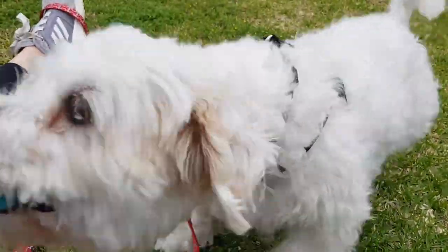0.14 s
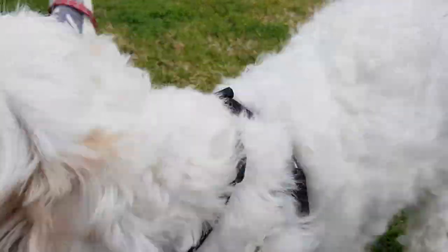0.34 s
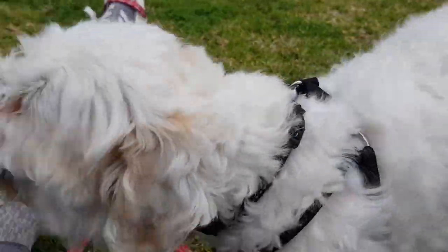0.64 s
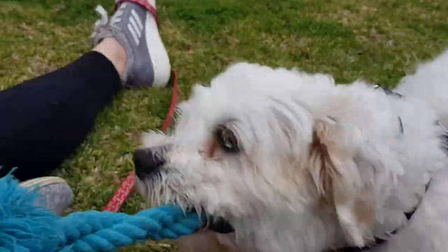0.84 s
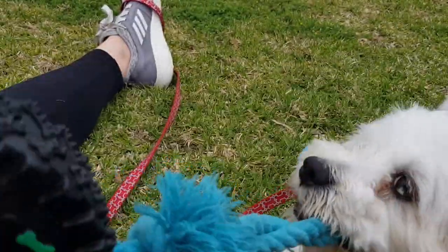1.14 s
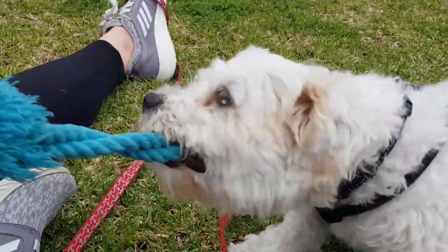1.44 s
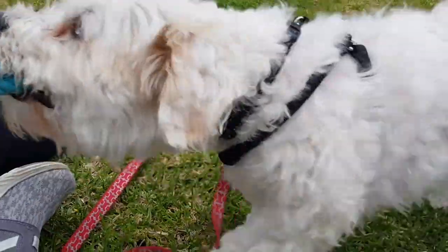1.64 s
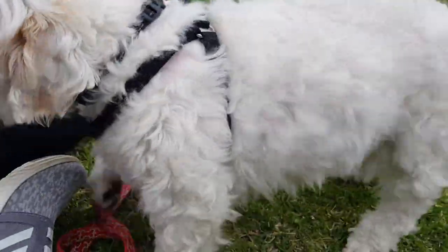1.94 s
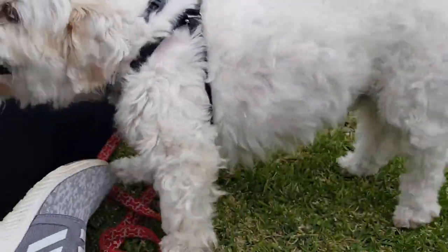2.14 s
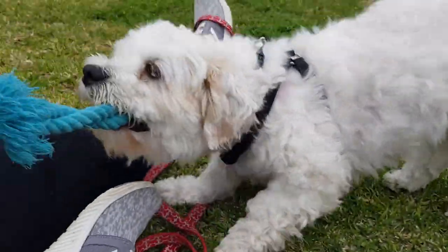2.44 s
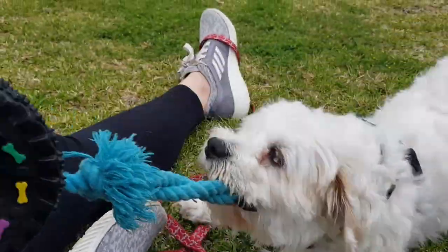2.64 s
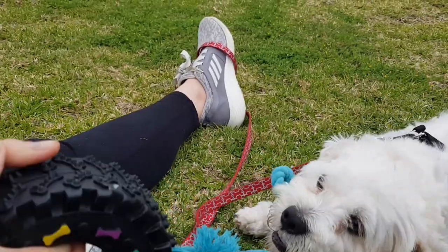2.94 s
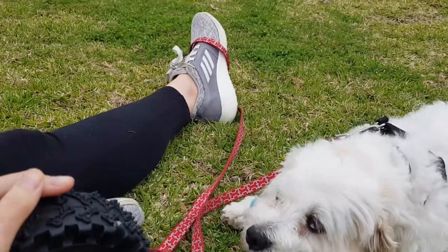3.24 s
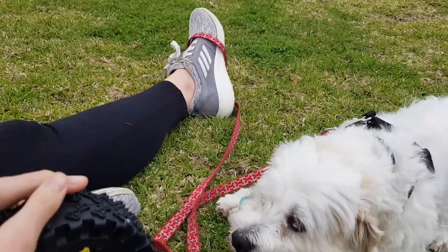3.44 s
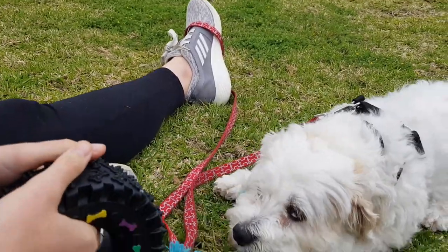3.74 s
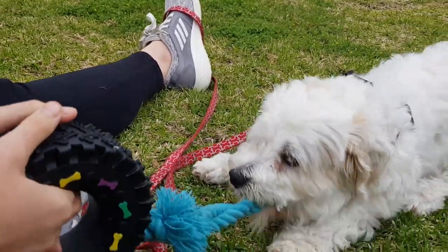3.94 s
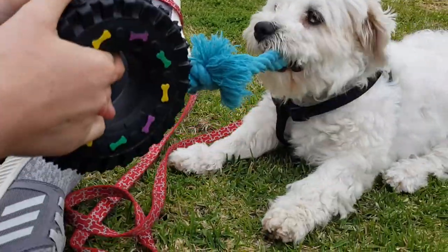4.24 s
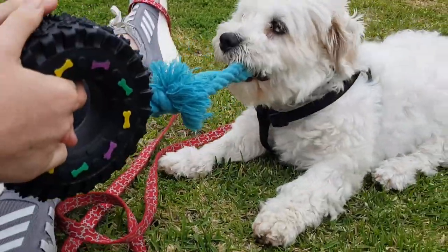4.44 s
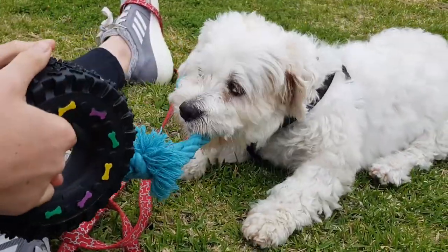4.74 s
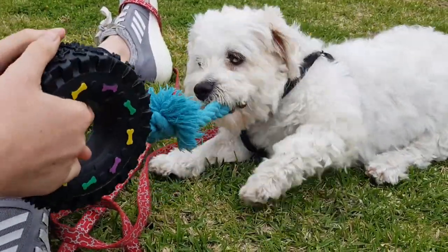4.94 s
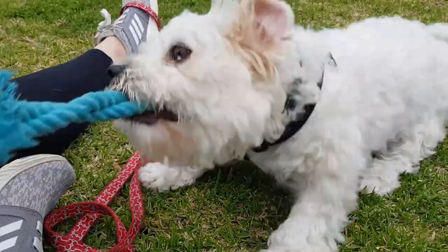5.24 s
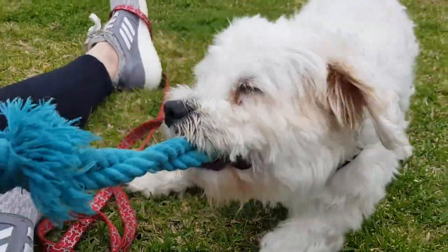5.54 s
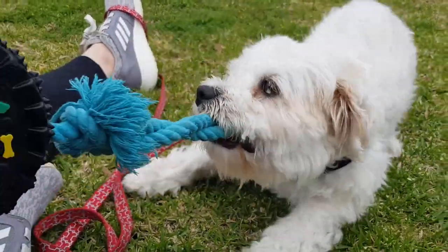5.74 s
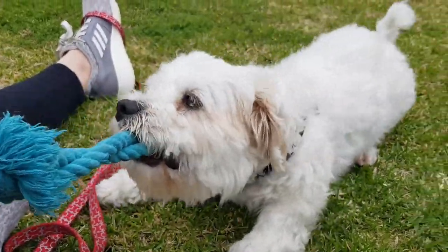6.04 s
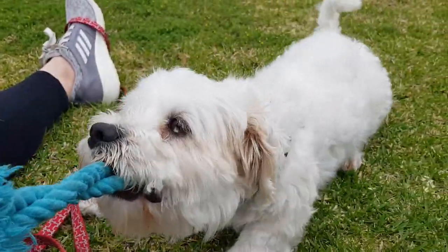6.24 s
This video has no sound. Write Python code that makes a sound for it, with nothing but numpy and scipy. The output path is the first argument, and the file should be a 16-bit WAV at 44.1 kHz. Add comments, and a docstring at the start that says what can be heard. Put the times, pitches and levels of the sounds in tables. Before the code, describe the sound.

A small dog growls in short rough bursts round a rope toy, close up, over rustling fur and grass, small snaps and a low distant engine hum.

```python
"""On a lawn, close to a two-port microphone, a small dog growls in short bursts round a rope toy, from
the first moment to the last: its flapping palate chops rough breath into throbs and its chest booms.
All along, fur, rope and grass rustle as flickering hiss; far off, an engine hums as one wavering tone
and the park washes as bass-heavy noise. The rubber toy knocks near 0.7 and 1.5 s as short sines, rope
and harness snap as noise ticks from 1.4 s on, and a thin tone whistles downward once, from 3.1 to 3.4 s."""
import sys
import numpy as np
from scipy import signal
from scipy.io import wavfile
from scipy.ndimage import uniform_filter1d

SR = 44100
rng = np.random.default_rng(int(sys.argv[2]) if len(sys.argv) > 2 else 0)


def wav_record(signal):
    """Record a signal, one row per channel, as 16-bit PCM in the file named by sys.argv[1]."""
    frames = np.transpose(np.atleast_2d(signal))
    bounded = np.clip(frames, -1, 1)
    # unit amplitude maps onto the largest positive 16-bit level
    quanta = np.round(bounded * 32767).astype(np.int16)
    wavfile.write(sys.argv[1], SR, quanta)


N = 280917

# The dog's growls, parts of growls and faint breaths, one a row:
# (first puff [s], last puff [s], place of the middle [0-1], puffs [count],
# slowing of the flutter [-1 to 1], effort at start, middle, end [dB, dB, dB],
# steady breath over effort at start, end [dB, dB], tongue resonance at start, end [Hz, Hz],
# throat, jaw, palate, lips, nose gains [dB each], change of throat, jaw and lips as the mouth moves [dB],
# left minus right [dB], chest over effort [dB], fold pitch at mid-growl [Hz], breadth of the chest boom [0-1])
GROWLS = [ (0.053, .298, 0.33, 10, -.05, -56, -51, -54.5, 3, 4.5, 1710, 1670, 11.5, 4.5, 1, -2, 1.5, -5, 6, 22, 114.4, 0.52),
          (0.345, 0.626, 0.15, 8, 0.2, -45, -45, -52, -1, -14.5, 1640, 1680, 6, -6, -4.5, -4.5, -5, -3.5, 7.5, 14, 140, 0.98),
          (0.898, 0.965, 0.4, 3, -0.017, -72, -57, -62, -4, 10.5, 1680, 1680, -3, -10, -3.5, -6.5, -3, 1, 3.5, -7, 140, .2),
          (1.209, 1.387, 0.096, 5, 0.35, -51.5, -47, -57.5, -12, -5, 1580, 1720, 3, -2, 1.5, -13, -8, 1.5, 2.5, 11, 132, 0.21),
          (1.682, 1.751, 0.22, 3, 0.85, -54.5, -47, -60.5, 4.5, -5, 1830, 1710, -10, -12.5, -3.5, -10, -4, 7.5, 7.5, -5, 140, .2),
          (1.999, 2.068, 0.46, 3, 0.14, -73.5, -78, -81.5, -1, 14, 1450, 1500, 13.5, -13, 8.5, -1, 4, 4, 3.5, -2, 140, .2),
          (2.344, 2.398, 0.56, 3, -0.084, -60.5, -62, -66.5, -10, 17, 1750, 1770, -7, -16, -7.5, -15, -8, 5, 2.5, -6, 140, .2),
          (2.664, 3.067, 0.71, 11, 0.14, -46.5, -43, -51.5, -9.5, -14, 1755, 1740, -3, 0.5, 3, -4.5, -8, -9.5, 4.5, 10, 160, 0.44),
          (3.279, 3.32, .5, 2, .01, -68.5, -66, -63.5, -9, -6, 1680, 1660, 3, -12, -3, -10, -11, .1, 6, 7, 140, .2),
          (3.52, 3.555, .5, 2, .01, -71, -72, -74.5, 0, -4, 1710, 1730, 4, .1, 0.5, -9, -18, .1, 4, 7, 140, .2),
          (3.823, 3.902, 0.61, 3, .07, -57.5, -53, -53.5, -19, -1.5, 1710, 1620, 3, -4, 7, -12.5, -5, 6.5, 4, 16.5, 160, 0.45),
          (3.957, 4.106, .3, 4, .05, -57, -61.5, -64, -4.5, 2.5, 1630, 1450, 8, -6, 0.5, -9.5, 0.5, -3, 4, 19, 162, 0.32),
          (4.419, 4.537, 0.45, 4, .01, -71, -73, -79, -1, 1, 1540, 1590, -15, -6, -14, -19, -8, 7, 8, 7, 140, .2),
          (4.754, 4.969, .4, 6, -0.11, -84, -85, -93, 7.5, 6, 1780, 1680, -10, -14, -9, -7, -18, 3, 5, 6, 140, .2),
          (5.073, 5.111, .5, 2, .01, -81.5, -74, -80, 8, 1, 1640, 1600, 3, -8, 3.5, -13, -3, -2, 9, 3, 140, .2),
          (5.147, 5.214, 0.52, 4, -0.2, -63.5, -56, -63, -8.5, 13, 1570, 1640, 5, 14.5, -4, -8, -4, -8.5, 4, -7, 140, .2),
          (5.337, 5.483, 0.21, 7, 0.13, -66, -57, -71.5, 3, 12.5, 1650, 1820, 4, 7, -0.5, 0.5, 2, -4.5, 5.5, 20, 148, 0.54),
          (5.679, 5.845, 0.27, 6, 0.012, -64.5, -52.5, -63, 1.5, -11, 1660, 1580, 3, 4, -3.5, -2, -2.5, -2, 4.3, 13, 157, 0.32),
          (5.9, 5.997, .3, 3, .01, -74, -86, -86, 0, 1, 1610, 1870, -8, 5, -5, -12, -14, -6, 4, 3, 140, .2),
          (6.139, 6.367, 0.56, 7, 0.054, -68.5, -62.5, -74, -9, -8, 1630, 1600, 12, 11.5, 9, -6.5, 9.5, 10.8, 2, 27.5, 148, 0.14),
          ]
# Resonances of the dog's throat, mouth and nose:
# (frequency [Hz], pole width [Hz], level [dB], left minus right [dB])
THROAT_MODE = (730, 653, -7, -1.5)
JAW_MODE = (1171, 400, 0.18, 1.1)
PALATE_MODE = (2360, 780, 0.24, 0.71)
LIPS_MODE = (3464, 560, 1.9, 1.8)
NOSE_MODES = [(4223, 400, -9, 0.87), (4960, 1200, -4.5, 0.89), (6420, 2040, -6, 0.83),
              (10900, 2200, -6.5, 1.8)]
# The tongue's resonance, whose frequency follows the growl: (pole width [Hz], level [dB], left minus right [dB])
TONGUE_MODE = (584, 6.4, -7.5)
# Head start of the left microphone port: (frequency [Hz], phase lead [rad])
PORT_LEAD = [(640, -1.1), (1150, -1.4), (1750, 1.1), (2400, -.6), (3500, 2.0), (5000, 1.6)]
# Bed of fur, rope and grass close by: (time [s], level [dB])
RUSTLE_LEVEL = [(0.0, -55.5), (0.33, -51.5), (0.55, -62), (0.95, -61), (1.06, -71), (1.4, -64),
                (1.65, -56.5), (2.3, -63.5), (2.68, -57.5), (3.12, -63), (3.19, -72.5), (3.85, -74),
                (4.1, -61.5), (4.28, -75), (4.77, -78), (5.05, -72), (5.16, -58), (5.6, -65), (5.94, -70.5),
                (6.37, -57.5)]
# Its spectrum, shape only: (frequency [Hz], relative density [dB per Hz])
RUSTLE_COLOUR = [(880, -24), (1500, 6.5), (1640, -3), (3840, -7), (4450, -4), (9190, -5), (10900, -2),
                 (15600, -5)]
# Single brushes of fur and rope: (middle time [s], peak level [dB], length [s])
BRUSHES = [(0.068, -59, 0.035), (0.233, -57, 0.063), (0.347, -54, 0.17), (0.807, -67, .1),
           (0.933, -63, 0.078), (1.626, -62, .08), (1.756, -53.5, 0.11), (1.925, -63, 0.063),
           (2.054, -60, .05), (2.24, -66, 0.094), (2.52, -80, 0.092), (3.917, -56.5, 0.14),
           (4.175, -70, .1), (4.591, -68.5, 0.21), (4.92, -72, 0.21), (5.188, -60, 0.055),
           (5.264, -59, .05), (5.316, -56.5, 0.28), (5.715, -64, 0.11), (6.233, -64, 0.059)]
# Snaps of rope and harness: (time [s], onset level [dB], left minus right [dB])
SNAPS = [(1.3908, -37, 1.5), (2.174, -33, 1), (2.1832, -35.5, -1), (4.586, -46, 2), (4.8828, -45, 1.5),
         (4.9324, -47, 2.5), (5.254, -29.5, 0), (5.3196, -28.5, 7), (5.45, -42, 5), (5.4653, -44, 0),
         (5.909, -54, 2.0), (6.112, -41, 3.0), (6.134, -46, 2), (6.2297, -43, 1)]
# Soft knocks of the rubber toy: (time [s], level before the soft attack [dB], frequency [Hz])
KNOCKS = [(0.686, -20.5, 330), (1.472, -28, 298)]
# The thin falling whistle: (time [s], frequency [Hz], level [dB])
WHISTLE = [(3.06, 6700, -79), (3.13, 6720, -80), (3.22, 6540, -74), (3.3, 6250, -73), (3.36, 5860, -75),
           (3.43, 5630, -85)]
# The far engine's hum, which swells and dips: (time [s], level [dB])
HUM_LEVEL = [(0.0, -35.5), (0.4, -36.5), (0.6, -45.5), (0.97, -36.5), (1.54, -41.5), (1.63, -56),
             (1.76, -38.5), (2.08, -34.5), (2.69, -39.5), (2.76, -48), (3.07, -38.5), (3.6, -46),
             (3.7, -53), (4.0, -50), (4.08, -39.5), (5.53, -41.5), (5.67, -59), (5.78, -38), (6.04, -64),
             (6.16, -36.5)]
# Spectrum of the park, shape only: (frequency [Hz], relative density [dB per Hz])
PARK_COLOUR = [(12, -67), (20, -38.5), (50, -5), (95, -5), (116, -5), (186, -17), (453, -27.5),
               (669, -35.5), (1590, -42), (1980, -41), (2700, -51.5), (3460, -59.5), (6220, -70),
               (11800, -54), (15600, -54)]
# Likeness of the park at the two ports: (frequency [Hz], correlation [0-1])
PARK_LIKENESS = [(60, 0.56), (130, 1), (290, 0.65), (640, 0.34), (1400, 0.013), (15000, .01)]
# Stereo balance of the park: (frequency [Hz], left minus right [dB])
PARK_BALANCE = [(60, 1), (110, 2.5), (200, 5.5), (380, 3.5), (700, 7), (1290, 5.5), (2380, -3), (4400, 5),
                (8120, 7), (15000, -2)]

LEAD_S, TAIL_S = 0.048, 0.06  # the breath swells in before the first puff and trails after the last
PUFF_SHARE, PUFF_SCATTER_DB = 0.82, 0.9  # open share of each flutter cycle; unevenness of the puffs
RUMBLE_RISE_S, RUMBLE_FALL_S = 0.046, 0.066
PITCH_ARCH = 0.15  # the fold pitch starts and ends lower by this share
HUM_HZ, HUM_SAG_HZ_PER_S = 85.55, -0.2967
PARK_DB = -42.5
EDGE_HZ = 15800  # top of the recorder's band


def growl(first, last, middle, puff_count, slowing, start_db, middle_db, end_db,
          breath_from_db, breath_to_db, tongue_from_hz, tongue_to_hz,
          throat_db, jaw_db, palate_db, lips_db, nose_db, opening_db, pan_db, chest_db, pitch_hz, breadth):
    """Uneven fold cycles slap and gate the breath, which rings the shifting cavities of mouth and nose."""
    length = last - first
    t = np.arange(-LEAD_S, length + TAIL_S, 1 / SR)
    since_start = t - t[0]
    through = since_start / (t[-1] - t[0])
    fold_hz = pitch_hz * (1 - PITCH_ARCH + PITCH_ARCH * np.sin(np.pi * through))

    effort_s = [0, length * np.clip(middle, 0.05, 0.95), length]
    effort = amp(np.interp(t, effort_s, [start_db, middle_db, end_db]))
    fade = np.clip(np.minimum(since_start / LEAD_S, (t[-1] - t) / TAIL_S), 0, 1)
    breath = amp(breath_from_db + (breath_to_db - breath_from_db) * through) * fade ** 2
    puffs, passage = flutter(t, length, round(puff_count), slowing)
    mouth_push = effort * (breath * passage + puffs)
    # the long nasal passage evens the puffs
    nose_push = 0.5 * mouth_push + 0.29 * uniform_filter1d(mouth_push, size=1800)

    turns = np.cumsum(fold_hz * (1 + 0.18 * wander(len(t), 50))) / SR
    strength = amp(1.8 * wander(len(t), 90))
    slaps = evened(np.diff(np.floor(turns), prepend=0))  # one click a fold cycle
    gate = 2.2 + np.exp(np.cos(2 * np.pi * turns))
    shared, apart = rng.standard_normal((2, len(t)))
    # mouth corners and nostrils hiss apart, so the ports hear partly different air
    hisses = np.array([shared, np.cos(0.75) * shared + np.sin(0.75) * apart])
    air = strength * (evened(gate * hisses) + 0.4 * slaps)

    mouth_db = opening_db * through
    tongue_hz = np.interp(t, [0, length], [tongue_from_hz, tongue_to_hz])
    tract = [(*THROAT_MODE, throat_db + mouth_db),
             (*JAW_MODE, jaw_db + mouth_db),
             (tongue_hz, *TONGUE_MODE, 0),
             (*PALATE_MODE, palate_db),
             (*LIPS_MODE, lips_db + mouth_db),
             *((*mode, nose_db) for mode in NOSE_MODES)]
    voice = np.zeros((2, len(t)))
    for k, (hz, width, db, side_db, gain_db) in enumerate(tract):
        flap = 1 + 0.025 * wander(len(t), 15)  # loose tissue detunes each cavity
        lead = np.exp(1j * read(PORT_LEAD, np.mean(hz)) * np.c_[[1, 0]])  # left port only
        rung = (ring(air, hz * flap, width) * lead).real
        push = nose_push if k > 5 else mouth_push  # the lowest nose resonance goes with the mouth
        # neighbouring cavities ring in opposite sign, so the valleys between them fill in
        voice += (-1) ** k * push * amp(db + gain_db) * sides(side_db)[:, None] * rung
    return voice * sides(pan_db)[:, None], chest(since_start, effort * amp(chest_db), fold_hz, breadth)


def flutter(t, length, count, slowing):
    """The palate opens for each puff, then briefly narrows the passage; returns puffs and passage."""
    u = np.linspace(0, 1, 200)
    cycles = (count - 1) * (u + slowing * u * (1 - u))
    times = length * np.interp(np.arange(count), cycles, u)
    scatter_db = PUFF_SCATTER_DB * rng.standard_normal(count)
    puffs, shut = np.zeros((2, len(t)))
    for s, gap, db in zip(times - t[0], np.gradient(times), scatter_db):
        span = PUFF_SHARE * gap
        add(puffs, s - span / 2, amp(db) * signal.windows.tukey(round(span * SR), 0.75))
        add(shut, s + span / 2 - 0.003, np.hanning(round(0.0027 * SR)))
    return puffs, 1 - 0.077 * np.minimum(shut, 1)


def chest(t, level, hz, breadth):
    """A rough low boom: noise gathered round or below the fold pitch, narrow or broad."""
    wide = np.clip(breadth, 0, 1)
    narrow, broad = rng.standard_normal((2, len(t)))
    boom = np.sqrt(1 - wide) * ring(narrow, hz, 96).real
    boom += np.sqrt(wide) * ring(broad, 0.77 * hz, 304).real
    swell = np.clip(np.minimum(t / RUMBLE_RISE_S, (t[-1] - t) / RUMBLE_FALL_S), 0, 1)
    return level * swell * boom * sides(4.4)[:, None]


def lawn(x):
    """A few weak reflections off ground and legs, different at each port."""
    taps = np.zeros((2, 900))
    at = rng.integers(20, 900, (2, 14))
    bounces = rng.choice([-1., 1.], at.shape) * amp(-15 - 1400. * at / SR)  # later ones are weaker
    np.put_along_axis(taps, at, bounces, 1)
    return x + signal.oaconvolve(x, taps, axes=1)[:, :N]


def rustle():
    """Dry fibres and blades brushing close by: flickering hiss with fine crackle."""
    bed = hiss(RUSTLE_COLOUR, lambda hz: 0.011 + 0 * hz, lambda hz: 1.8 + 0 * hz,
               patchy_db=2.5, flicker_db=1.5)
    sizes = amp(1.3 * np.minimum(rng.exponential(1, (2, N)), 5))
    crackle = sizes * (rng.random((2, N)) < 300 / SR)  # about 300 a second at each port
    grain = uniform_filter1d(crackle, size=40, axis=1)
    level = amp(curves(RUSTLE_LEVEL)[0])
    for s, db, length in BRUSHES:
        add(level, s - length / 2, amp(db) * np.hanning(round(length * SR)))
    return bed * (1 + 0.35 * evened(grain)) * level


def snaps():
    """Sharp dry ticks of dying noise, and dull knocks of a dying sine."""
    out, t = np.zeros((2, N)), np.arange(1300) / SR
    noises = rng.standard_normal((len(SNAPS), 2, 1300))
    for (s, db, pan_db), noise in zip(SNAPS, noises):
        tick = np.diff(noise, prepend=0) * amp(db - 60 * t / 0.018) / 2  # 60 dB down in 18 ms
        add(out, s, tick * sides(pan_db)[:, None])
    for s, db, hz in KNOCKS:
        decay = amp(db - 60 * t / 0.0067)
        attack = 1 - np.exp(-t / 0.0007)
        add(out, s, decay * attack * np.sin(2 * np.pi * hz * t) * sides(8.8)[:, None])
    return out


def whistle():
    """A slightly unsteady tone with its octave."""
    hz, db = curves(WHISTLE)
    t = np.arange(N) / SR
    on = np.clip(np.minimum(t - WHISTLE[0][0], WHISTLE[-1][0] - t) / 0.016, 0, 1)
    phase = 2 * np.pi * np.cumsum(hz * (1 + 0.0058 * wander(N, 195))) / SR
    level = np.sqrt(2) * amp(db + 1.6 * wander(N, 60)) * on
    tone = np.sin(phase) + amp(-12) * np.sin(2 * phase)
    return level * tone * sides(9.3)[:, None]


def hum():
    """The far engine: one low wavering tone that sags slowly in pitch."""
    hz = HUM_HZ + HUM_SAG_HZ_PER_S * np.arange(N) / SR + 0.763 * wander(N, 3.04)
    tone = np.sin(2 * np.pi * np.cumsum(hz) / SR)
    return np.sqrt(2) * amp(curves(HUM_LEVEL)[0]) * tone * sides(3.2)[:, None]


def park():
    """Far traffic and air: a wash of noise heavy in the bass."""
    return amp(PARK_DB) * hiss(PARK_COLOUR, lambda hz: read(PARK_LIKENESS, hz),
                               lambda hz: read(PARK_BALANCE, hz), patchy_db=-1.0, flicker_db=1.9)


def hiss(colour, same, balance_db, patchy_db, flicker_db):
    """Two channels of noise from random short-time spectra, partly alike at the two ports."""
    frames, hz = N // 256 + 5, np.fft.rfftfreq(1024, 1 / SR)
    a, b, c, d, patches = rng.standard_normal((frames, 513, 5)).T
    patches = uniform_filter1d(uniform_filter1d(patches, size=12, axis=0), size=14, axis=1)
    flicker = evened(uniform_filter1d(rng.standard_normal(frames), size=3))
    same = np.clip(same(hz), -1, 1)[:, None]
    left = a + 1j * b
    right = same * left + np.sqrt(1 - same ** 2) * (c + 1j * d)
    z = np.array([left, right]) * sides(balance_db(hz))[..., None]
    z *= amp(read(colour, hz)[:, None] + patchy_db * evened(patches) + flicker_db * flicker)
    out = signal.istft(z, nperseg=1024, noverlap=768)[1][:, :N]
    return out / np.sqrt(np.mean(out.mean(0) ** 2))  # unit power of the two channels' mean


def ring(x, hz, width):
    """A steep moving resonance (three equal poles); returns the complex wave with unit power."""
    turn = np.exp(2j * np.pi * np.cumsum(hz * np.ones(x.shape[-1])) / SR)
    r = np.exp(-np.pi * width / SR)
    out = turn * signal.lfilter([1], np.poly([r, r, r]), x / turn)
    return out / np.sqrt(np.mean(out.real ** 2) + 1e-20)


def wander(count, hz):
    """Smooth slow chance of unit size: noise through two equal poles at hz."""
    r = np.exp(-2 * np.pi * hz / SR)
    noise = rng.standard_normal(count + 4000)
    return evened(signal.lfilter([1], np.poly([r, r]), noise)[4000:])  # settled part only


def amp(db):
    """Amplitude for a level in dB."""
    return 10 ** (np.asarray(db) / 20)


def evened(x):
    """Scale to unit power."""
    return x / np.sqrt(np.mean(x ** 2) + 1e-20)


def read(points, hz):
    """Read a table of frequencies on a logarithmic scale."""
    f, value = np.transpose(points)
    return np.interp(np.log(hz + 1), np.log(f + 1), value)


def curves(rows):
    """The columns of a timed table at every sample of the scene."""
    s, *columns = np.transpose(rows)
    return [np.interp(np.arange(N) / SR, s, c) for c in columns]


def add(mix, s, sound):
    """Lay a sound into the mix at s seconds."""
    start = max(round(s * SR), 0)
    part = mix[..., start:start + sound.shape[-1]]
    part += sound[..., :part.shape[-1]]


def sides(db):
    """Left and right gains for a left-minus-right level."""
    return amp(np.array([db / 2, -db / 2]))


def scene():
    """The dog close by, its voice reflected by the lawn, over everything else out to the park."""
    voice, rumble = np.zeros((2, 2, N))
    for row in GROWLS:
        throbs, boom = growl(*row)
        add(voice, row[0] - LEAD_S, throbs)
        add(rumble, row[0] - LEAD_S, boom)
    return lawn(voice) + rumble + rustle() + snaps() + whistle() + hum() + park()


def record(dry):
    """The microphone drops the deepest bass; then the band limit of the recorder."""
    thin = signal.sosfilt(signal.butter(3, 42, "high", fs=SR, output="sos"), dry)
    band = signal.firwin(2047, EDGE_HZ, window=("kaiser", 9), fs=SR)
    return signal.oaconvolve(thin, band[None], "same")


dry = scene()
out = record(dry)
wav_record(out)
```